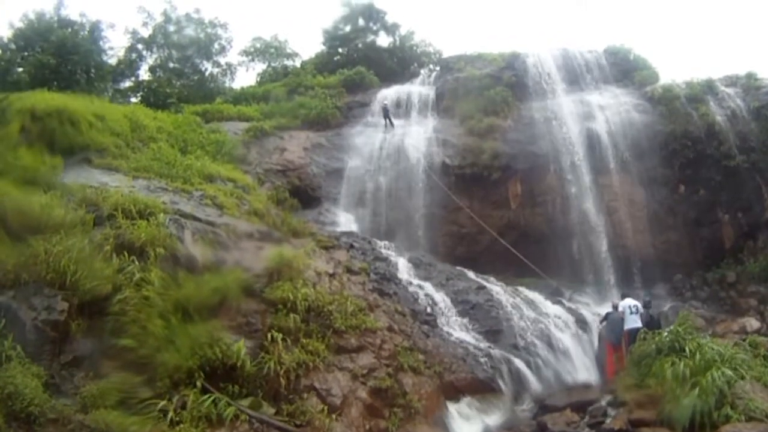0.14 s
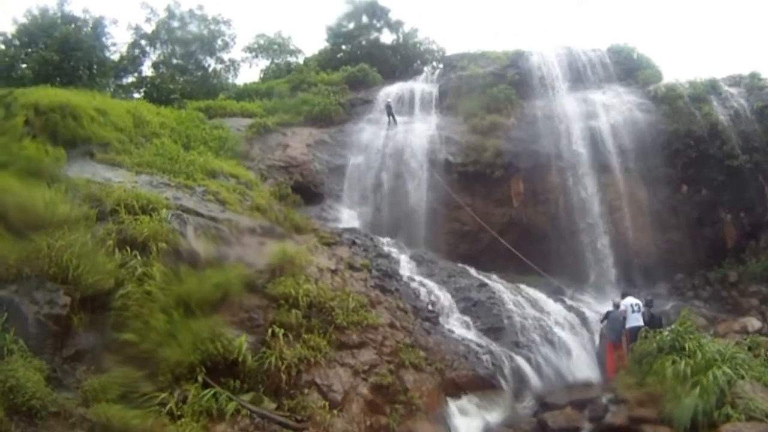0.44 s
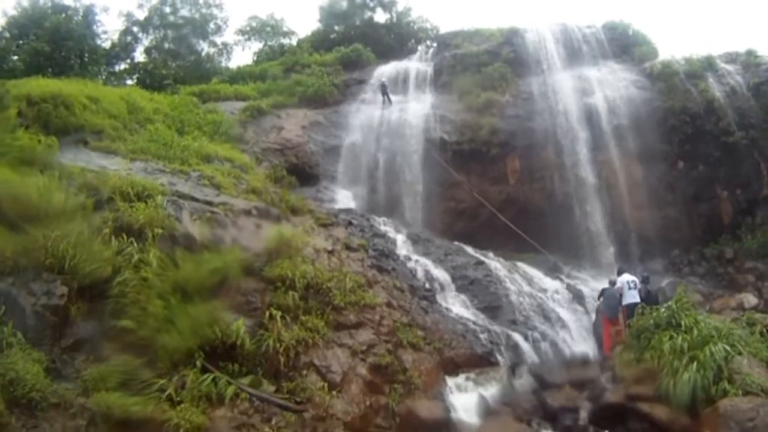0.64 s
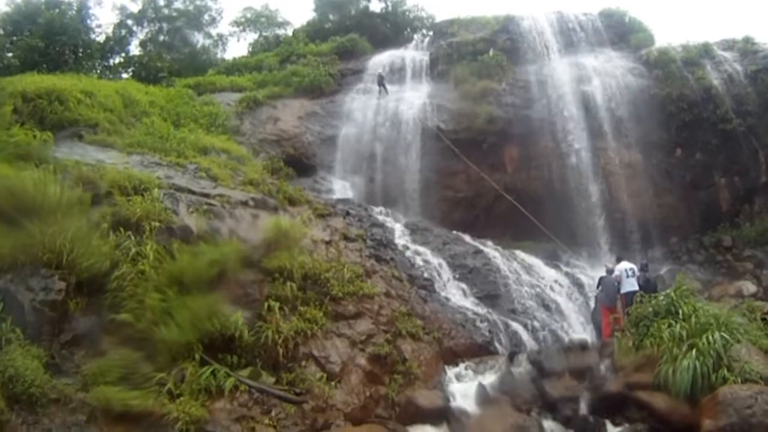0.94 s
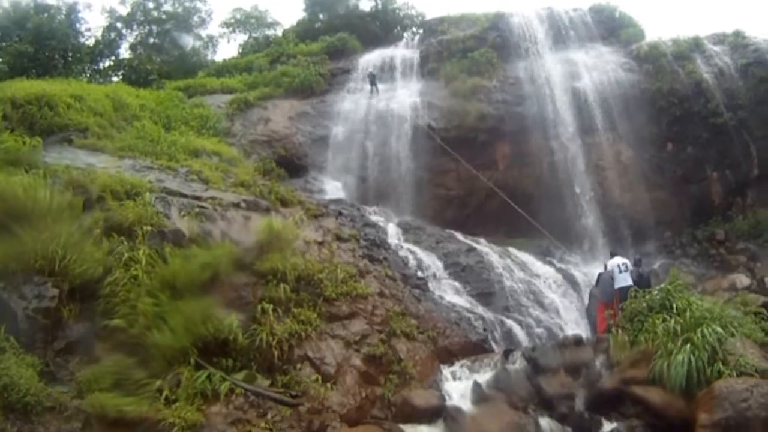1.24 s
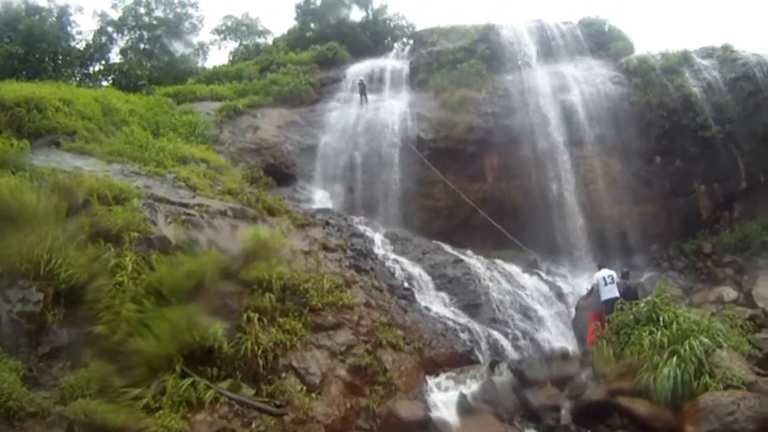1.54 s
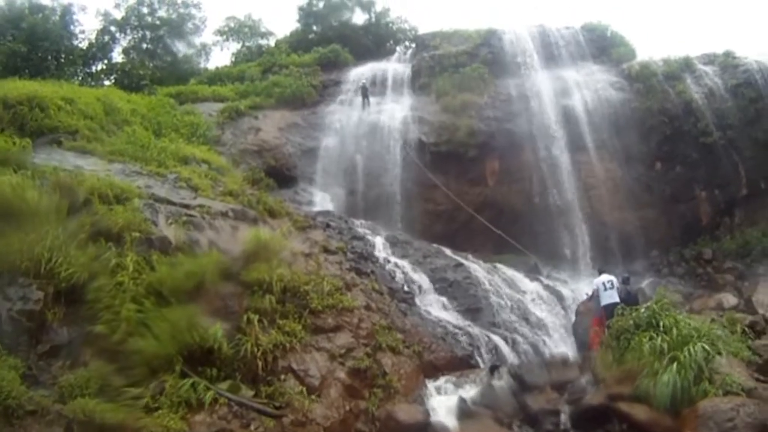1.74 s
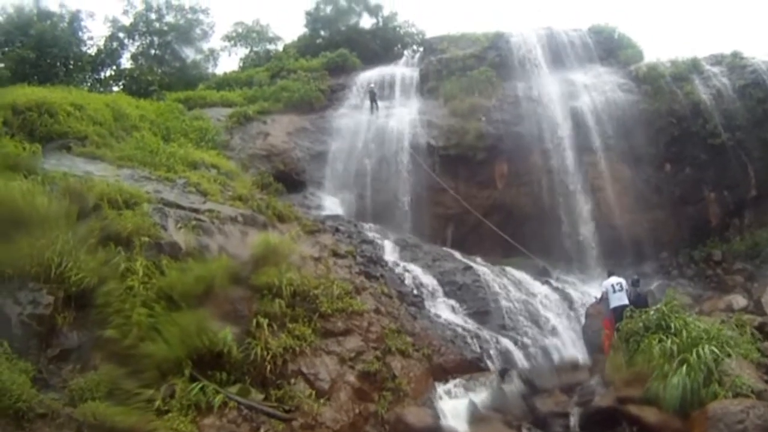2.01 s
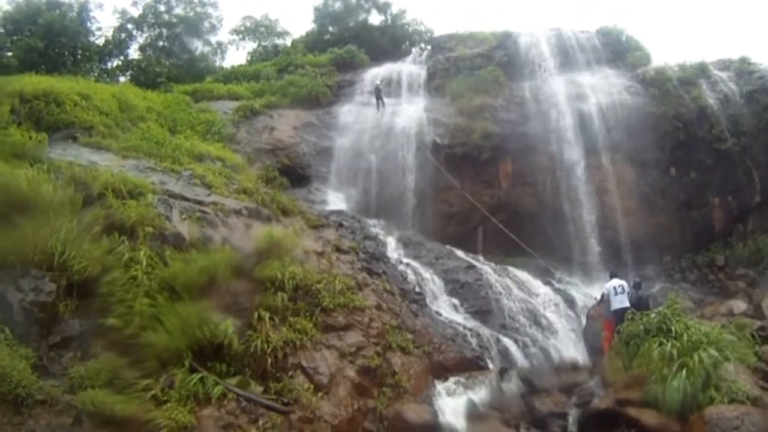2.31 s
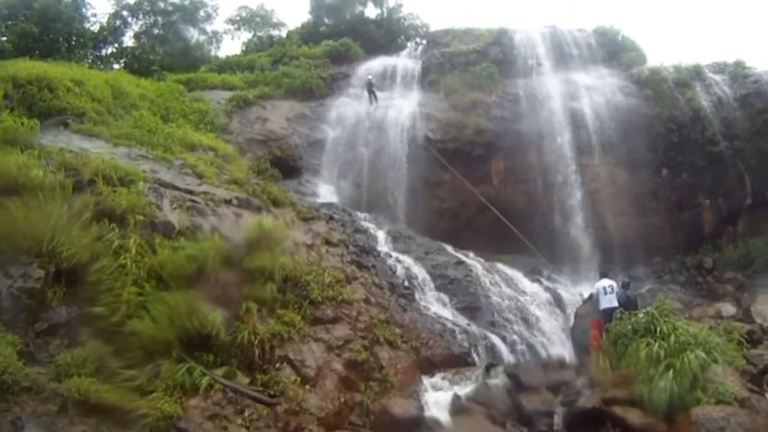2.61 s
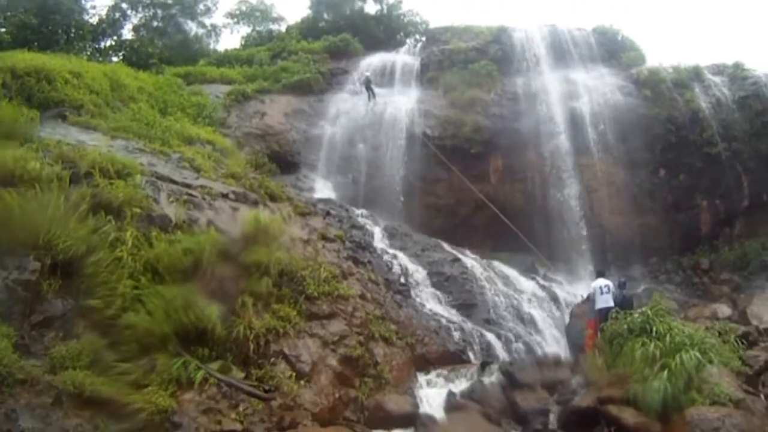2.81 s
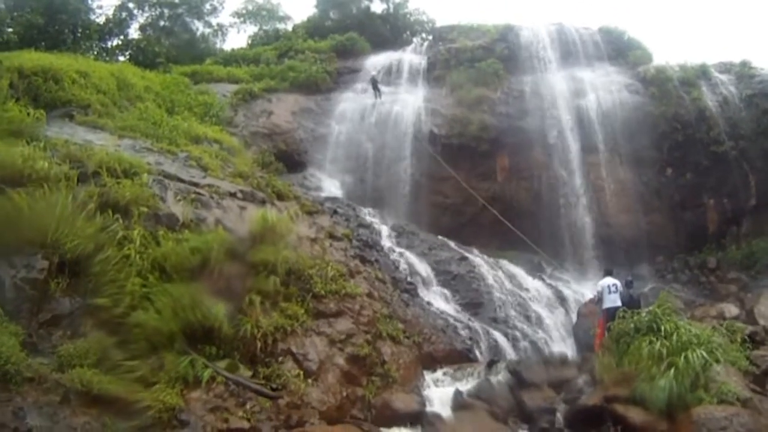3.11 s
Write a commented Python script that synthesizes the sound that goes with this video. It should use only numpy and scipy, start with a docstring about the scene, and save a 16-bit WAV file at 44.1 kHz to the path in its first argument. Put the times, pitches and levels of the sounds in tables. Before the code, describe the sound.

The steady rush of a waterfall carries on outdoors, with fine splashes on rock and a slightly glassy treble. A low breeze rumbles on the microphone, with brief thumping gusts that hit harder later on.

```python
"""A waterfall pours down a tall cliff and over rocks: a steady rush with fine splashing in it.
Gusts of wind thump the microphone of a small camera, whose case makes some pitches of the water ring.
The mono recorder turns itself down on the strongest gusts. It also holds each sample at a low rate,
which mirrors the rush upward into a glassy treble."""
import sys
import numpy as np
from scipy import signal
from scipy.fft import rfft, irfft
from scipy.io import wavfile
from scipy.ndimage import uniform_filter1d

SR = 44100
rng = np.random.default_rng(int(sys.argv[2]) if len(sys.argv) > 2 else 0)


def bounce(signal):
    """Save signal as a 16-bit WAV file at the path given by the first command-line argument."""
    frames = np.transpose(np.atleast_2d(signal))
    limited = np.clip(frames, -1, 1)
    pcm = np.round(limited * 32767).astype(np.int16)
    wavfile.write(sys.argv[1], SR, pcm)


N = 143766

# The tone of the water as heard through the camera's case: pitch_hz, relative_level_db
WATER_TONE = [(40, -9.5), (170, 4), (280, 2), (410, -5.5), (520, 0), (600, 2), (700, -9), (790, -17.5),
              (880, -15), (970, -9), (1250, -13), (1500, -11.5), (1750, -12.5), (1980, -9), (2240, -1),
              (2520, -4.5), (2850, -13.5), (3250, -15), (3700, -8), (4000, -13), (4350, -19), (4900, -16.5),
              (5450, -20), (5750, -26.5), (6000, -28.5)]


def amp(db):
    """Turns decibels into a gain."""
    return 10 ** (np.asarray(db) / 20)


def unit(x):
    """Scales a signal to an average power of one."""
    return x / np.sqrt(np.mean(x ** 2) + 1e-20)


def colour(x, tone):
    """Makes each pitch louder or softer, following a tone table."""
    pitch_hz, level_db = np.transpose(tone)
    all_hz = np.fft.rfftfreq(N, 1 / SR)
    curve_db = np.interp(np.log(all_hz + 1), np.log(pitch_hz + 1), level_db)
    return irfft(rfft(x) * amp(curve_db), N)


def drift(shape, size):
    """A smooth random wobble; a bigger size makes it slower."""
    return unit(uniform_filter1d(uniform_filter1d(rng.standard_normal(shape), size), size))


def water_rush(level_db=-30.5, swell_db=-0.05, flicker_db=0.04, patch_db=1.05):
    """The mass of falling water makes a steady noise that shifts a little in patches of time and pitch."""
    bands = signal.stft(rng.standard_normal(N), nperseg=256, noverlap=192)[2]  # pitch by time
    frames = bands.shape[1]
    patches = unit(uniform_filter1d(drift(bands.shape, size=14), size=6, axis=0))
    swell = drift(frames, size=110)
    flicker = drift(frames, size=12)
    bands = bands * amp(swell_db * swell + flicker_db * flicker + patch_db * patches)
    water = signal.istft(bands, nperseg=256, noverlap=192)[1][:N]
    return amp(level_db) * unit(colour(water, WATER_TONE))


def splashes(level_db=-40, drops_per_s=800, spread_db=2):
    """Many drops of uneven size slap the nearby rocks."""
    # How much brighter the splashes are than the rush: pitch_hz, relative_level_db
    brightness = [(200, -11), (1000, -2.5), (2500, 2.5), (5500, 3)]
    hits = rng.random(N) < drops_per_s / SR
    sizes = amp(spread_db * np.minimum(rng.exponential(1, N), 4))
    drops = hits * sizes * rng.choice([-1, 1], N)
    return amp(level_db) * unit(colour(colour(drops, brightness), WATER_TONE))


def wind(breeze_db=-31.5, wobble_db=2.5, steadiness=0.56):
    """Swirls of air thump the microphone: a light breeze, and short gusts that swell and die."""
    # The deep tone of air hitting the microphone: pitch_hz, relative_level_db
    rumble_tone = [(8, -15), (22, -2.5), (42, 2.5), (70, -0.5), (95, -0.5), (135, -5.5), (180, -12),
                   (240, -25.5), (400, -33.5), (900, -68)]
    # One row for each gust: peak_s, level_db, half_length_s
    gusts = [(0.112, -25.5, 0.013), (0.387, -26, .05), (0.446, -24.5, .014), (0.481, -23, 0.01),
             (.603, -17.5, .019), (0.659, -22.5, 0.021), (0.8, -22, 0.025), (0.897, -24, 0.019),
             (1.758, -23.5, 0.06), (1.945, -10, 0.0082), (1.97, -17.5, 0.022), (2.075, -20.5, 0.014),
             (2.13, -24.5, .06), (2.432, -19, 0.0077), (2.561, -15, 0.01), (2.621, -14, 0.019),
             (2.672, -20.5, 0.019), (2.89, -20, 0.022), (3.021, -16.5, 0.012), (3.065, -14, 0.034),
             (3.146, -14.5, 0.018), (3.21, -27, 0.043)]
    t = np.arange(N) / SR
    swirls = unit(colour(rng.standard_normal(N), rumble_tone))
    swirl_power = uniform_filter1d(abs(signal.hilbert(swirls)) ** 2, size=1100)
    swirls = unit(swirls / swirl_power ** (steadiness / 2))  # partly evened out, so the gusts lead
    gust_power = sum(amp(db) ** 2 * np.exp(-((t - peak) / half) ** 2) for peak, db, half in gusts)
    breeze = amp(breeze_db + wobble_db * drift(N, size=1200))
    return swirls * np.sqrt(breeze ** 2 + gust_power)


def scene():
    """Water and wind at one microphone, the same in both channels."""
    return np.tile(water_rush() + splashes() + wind(), (2, 1))


def limiter(x, limit_db=-10, strength=0.61, release_db_per_s=65):
    """Turns the volume down on loud peaks, then lets it come back."""
    fall_db = np.arange(N) / SR * release_db_per_s
    peak_db = 20 * np.log10(abs(x).max(0) + 1e-9)
    fading_peak_db = np.maximum.accumulate(peak_db + fall_db) - fall_db
    over_db = np.maximum(fading_peak_db - limit_db, 0)
    return x * amp(-strength * uniform_filter1d(over_db, size=130))


def hold_samples(x, rate_hz=12000, repeats=4):
    """Samples at a low rate and repeats each sample: the steps mirror the sound around that rate."""
    samples = signal.resample_poly(x, rate_hz, SR, axis=1, window=("kaiser", 2))
    steps = np.repeat(samples, repeats, axis=1)
    return signal.resample_poly(steps, SR, rate_hz * repeats, axis=1)[:, :N]


def record(dry, cutoff_hz=15100):
    """The recorder softens peaks, holds its samples, then cuts off the highest treble."""
    stepped = hold_samples(limiter(dry))
    treble_cut = signal.firwin(511, cutoff_hz, window=("kaiser", 9), fs=SR)
    return signal.oaconvolve(stepped, treble_cut[None], "same", axes=1)


dry = scene()
out = record(dry)
bounce(out)
```